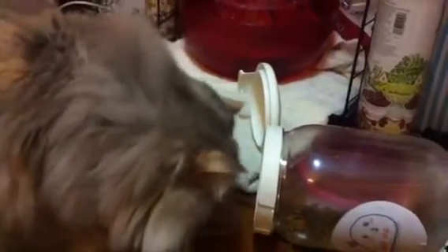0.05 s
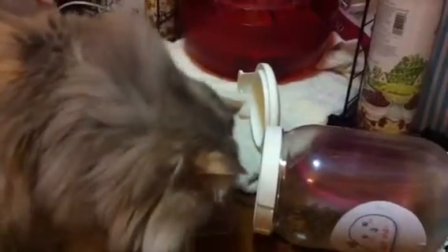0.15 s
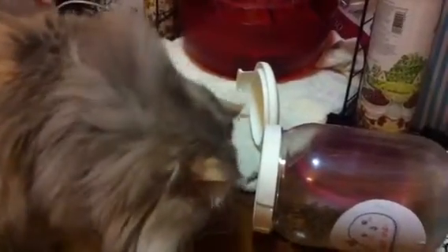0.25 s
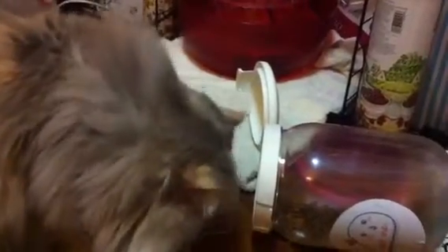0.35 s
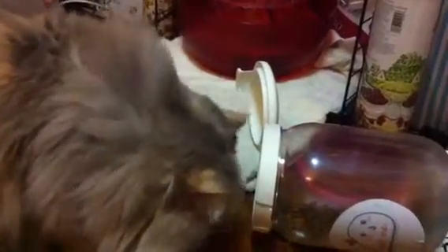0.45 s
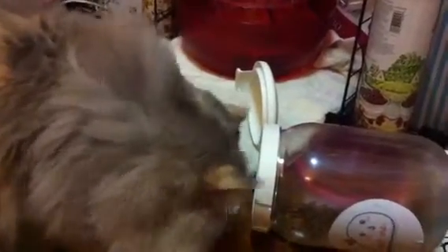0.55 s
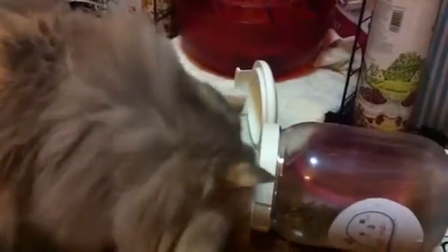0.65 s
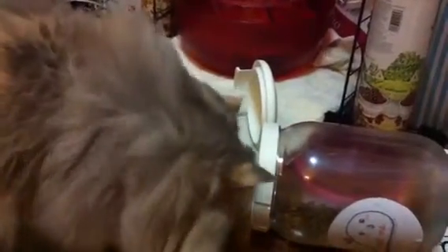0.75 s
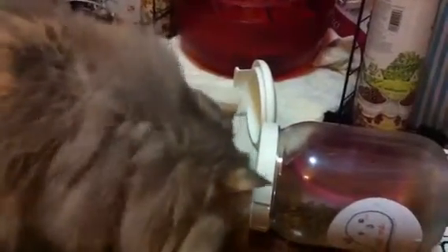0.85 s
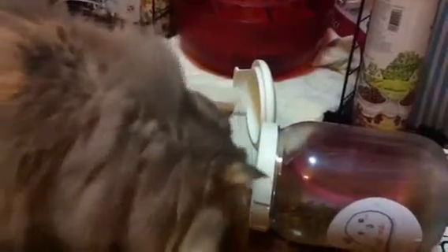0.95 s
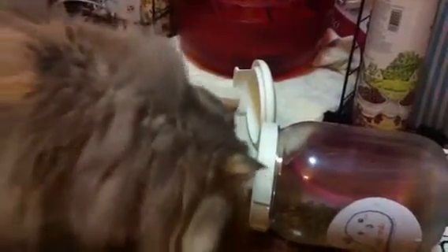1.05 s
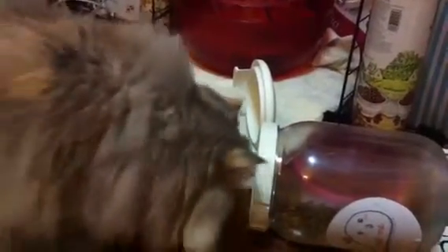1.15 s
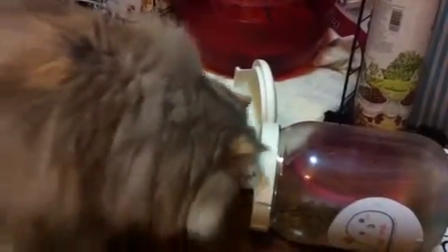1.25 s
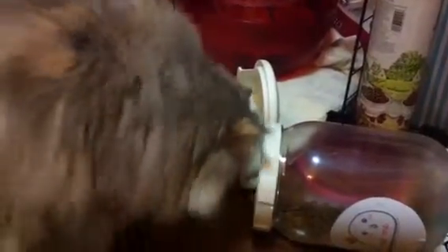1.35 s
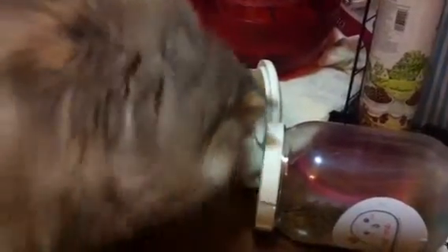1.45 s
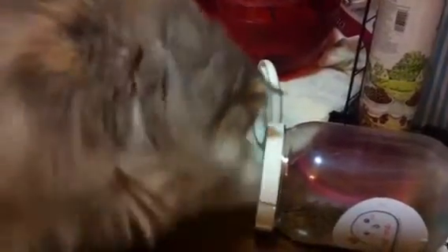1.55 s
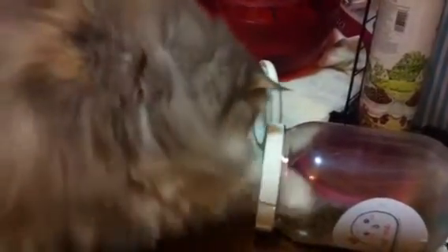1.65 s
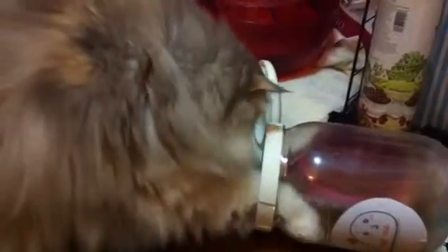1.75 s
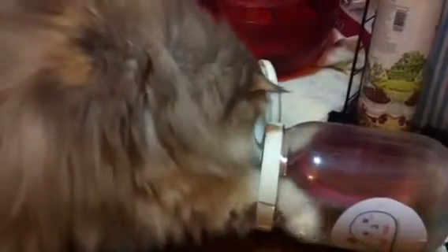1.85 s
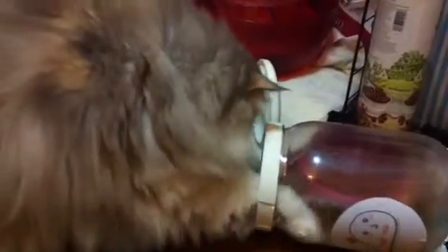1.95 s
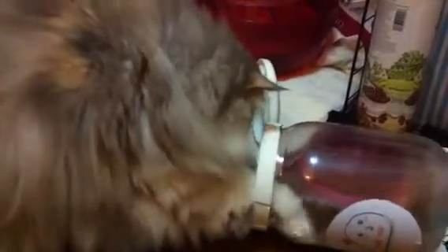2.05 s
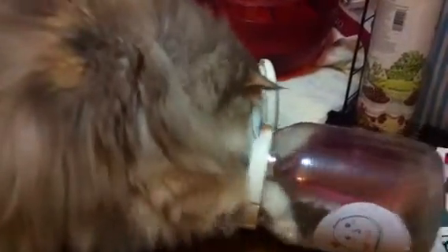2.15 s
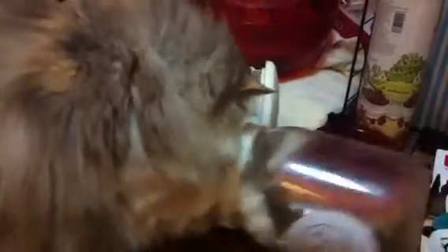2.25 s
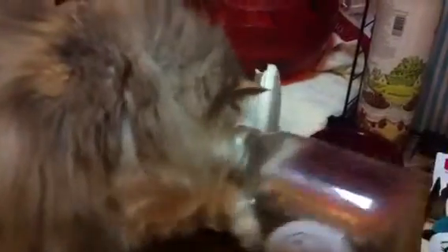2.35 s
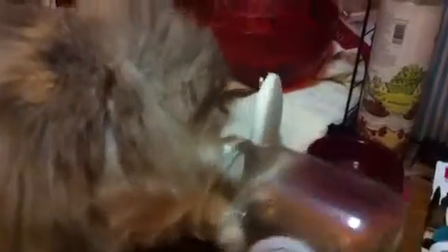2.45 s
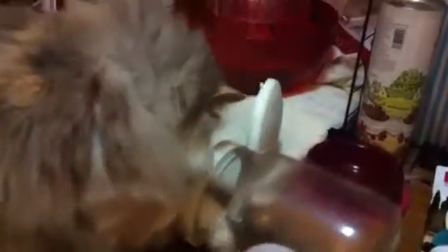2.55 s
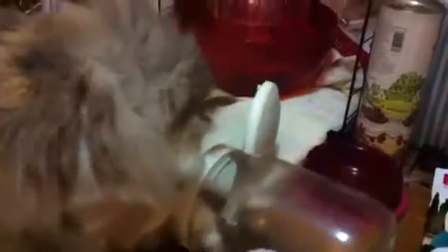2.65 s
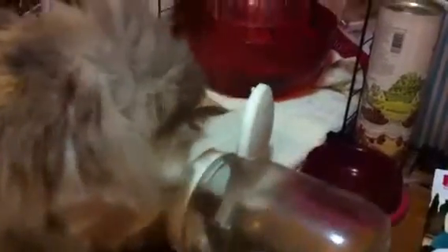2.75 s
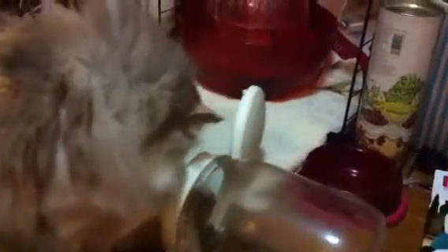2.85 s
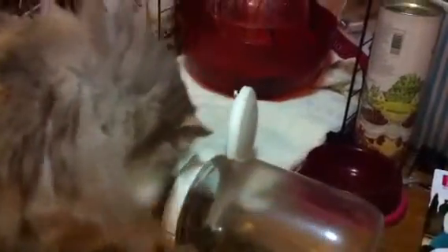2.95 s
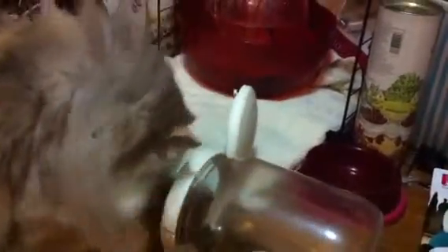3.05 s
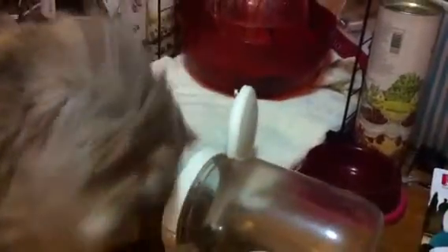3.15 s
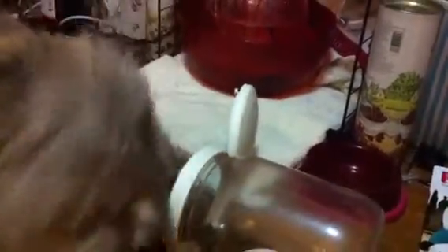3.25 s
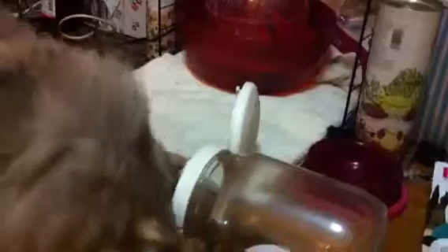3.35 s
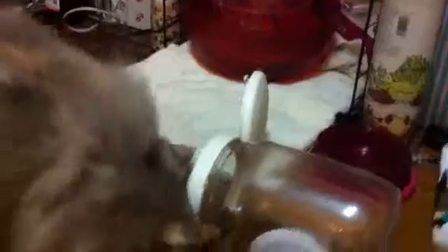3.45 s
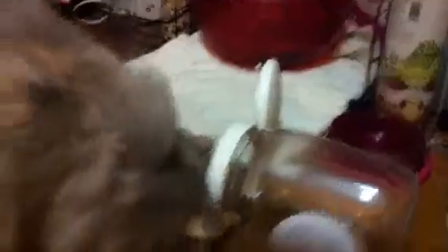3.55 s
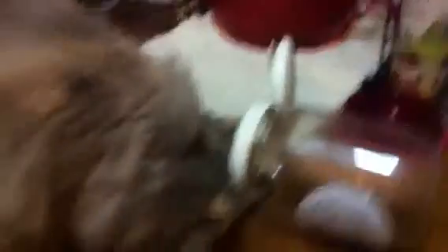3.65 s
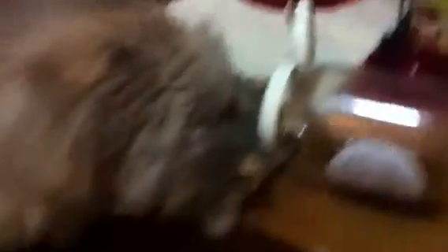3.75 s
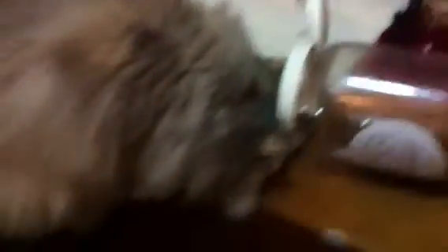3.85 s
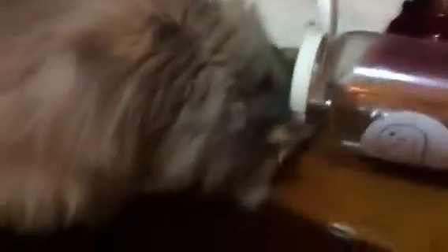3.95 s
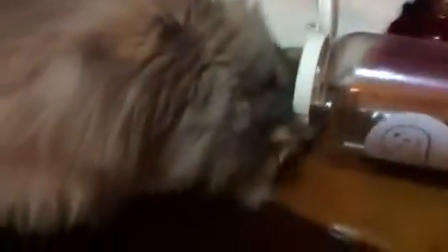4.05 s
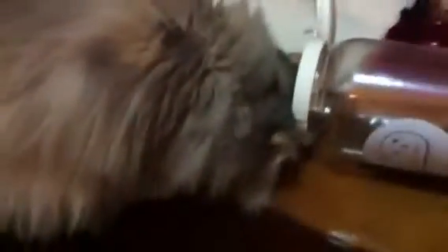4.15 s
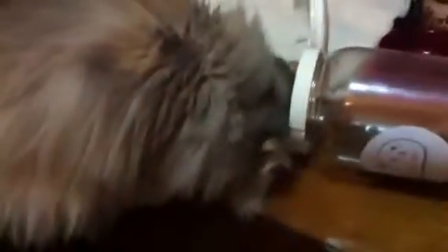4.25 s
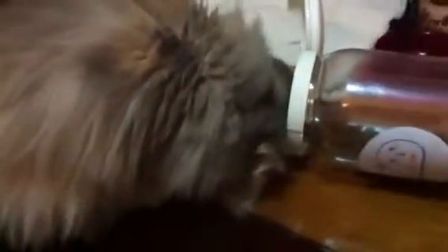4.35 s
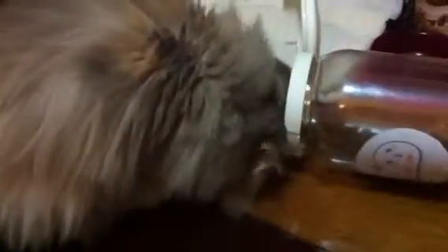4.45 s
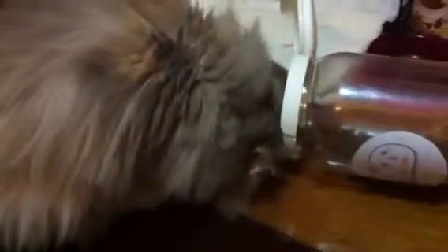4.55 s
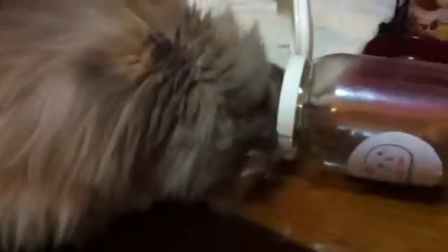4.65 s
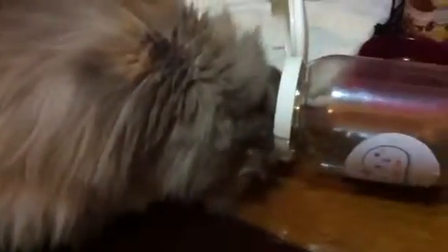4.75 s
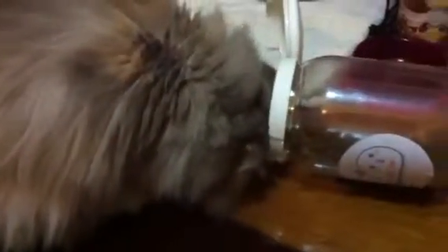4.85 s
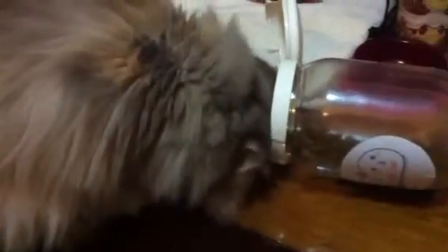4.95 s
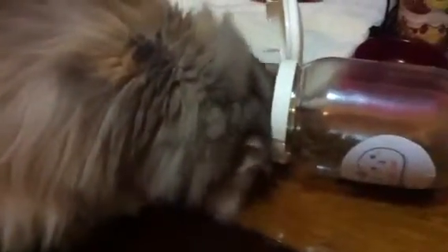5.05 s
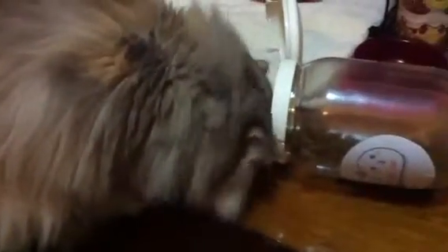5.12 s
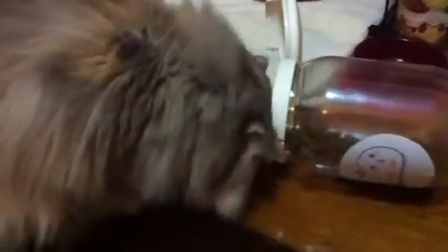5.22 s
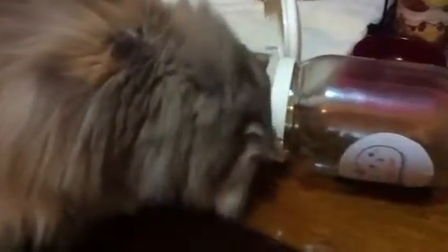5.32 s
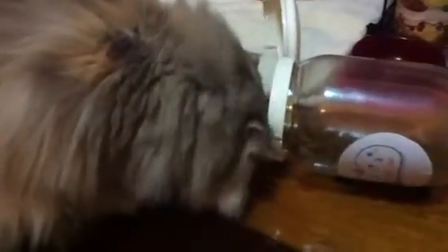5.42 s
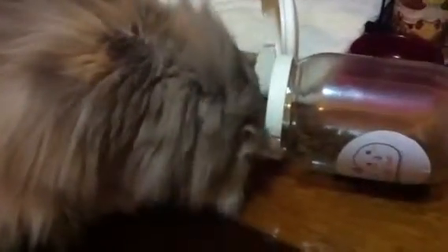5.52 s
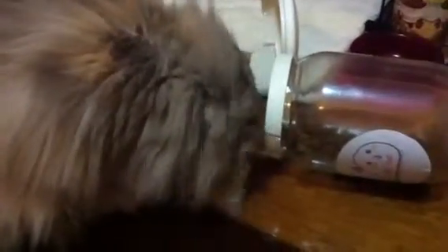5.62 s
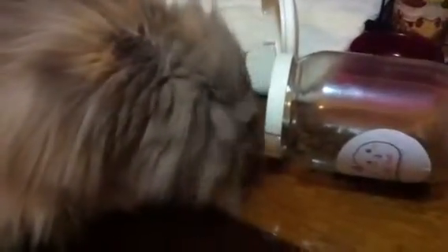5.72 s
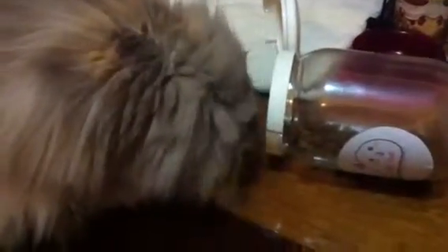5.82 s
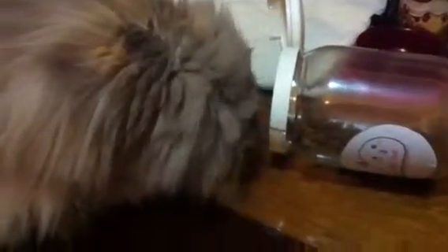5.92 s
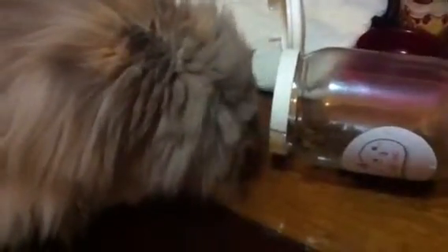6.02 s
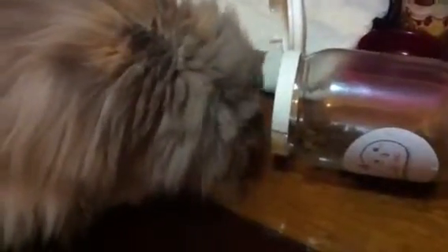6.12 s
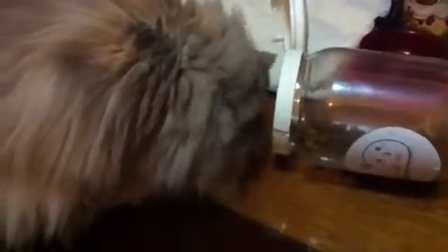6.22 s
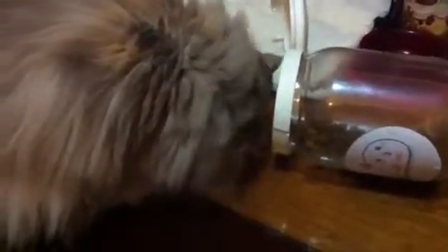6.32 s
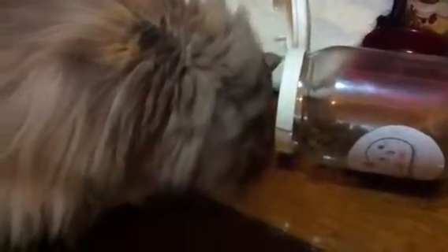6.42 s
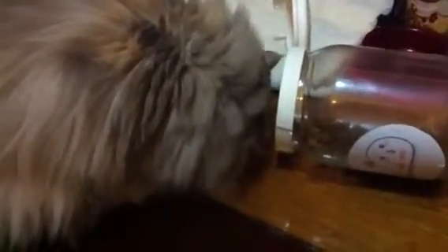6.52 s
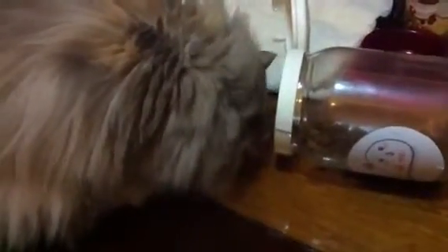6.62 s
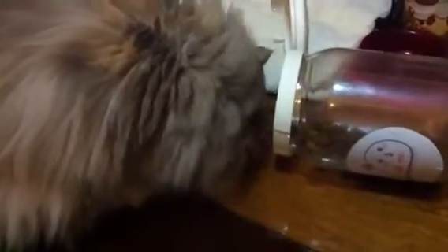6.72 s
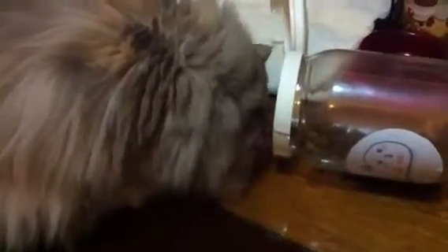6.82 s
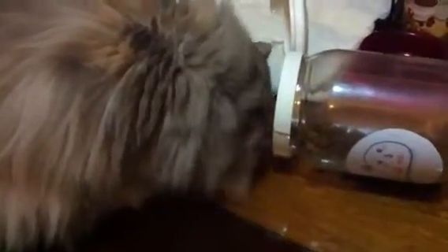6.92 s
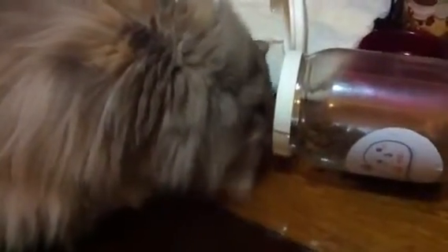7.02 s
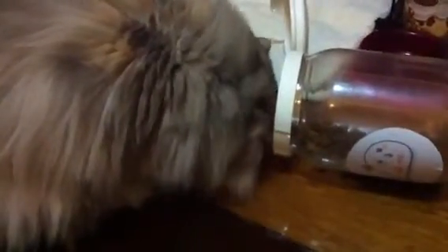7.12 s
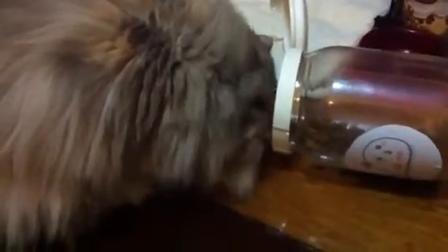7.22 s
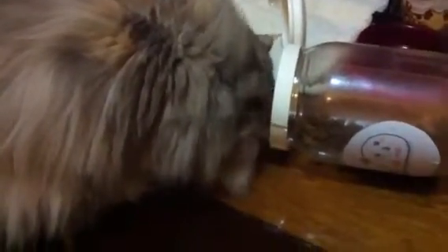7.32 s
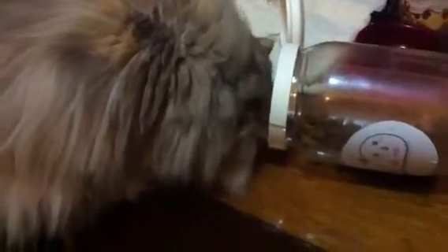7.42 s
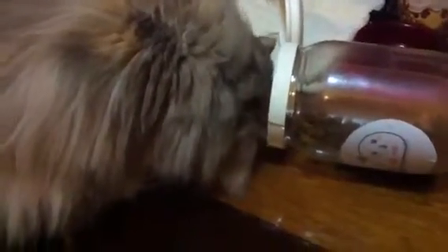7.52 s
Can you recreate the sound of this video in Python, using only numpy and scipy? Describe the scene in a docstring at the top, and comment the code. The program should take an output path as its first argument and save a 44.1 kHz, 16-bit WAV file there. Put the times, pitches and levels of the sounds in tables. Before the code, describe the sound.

A close, quiet indoor scene. From 0 to 2.2 seconds, dry pellets and claws make sparse, uneven crisp ticks inside a jar, some coloured by short hollow pips, over soft jerky rubbing and a light fur rustle. At about 2.3 to 2.4 seconds the jar is jolted: a rapid stuttering run of hard knocks with a woody thud and clatter, strongest near 2.35. A grainy slide and low drag across the table follow until about 2.8. At 2.84 comes one sharp, bright crack, with a tiny follow-up tap. From 3 seconds the delicate ticking and scratching resumes, with a duller scrape around 4.8 to 4.9, a distinctly louder bright click at 5.03, and continued pips and rustling until about 7.6. A short room tail surrounds everything; faint steady low rumble, soft hiss and a weak wavering appliance hum stay beneath.

```python
"""Cat at a food jar, close up

Indoors in a quiet home: a cat paws and noses dry food out of a jar lying on a wooden table, a phone close by.
Pellet and claw ticks are short noise bursts and snaps that ring the air in the jar; pips sound one resonance.
Rubbing is noise in stick-slip jerks; knocks ring the jar wall and the table as decaying sines.
A little room tail surrounds them; steady rumble and hiss, a hum and an appliance tone lie faintly underneath.
"""
import sys
import numpy as np
from scipy import signal
from scipy.fft import rfft, irfft
from scipy.io import wavfile
from scipy.ndimage import uniform_filter1d

SR = 44100
rng = np.random.default_rng(int(sys.argv[2]) if len(sys.argv) > 2 else 0)


def transcribe(signal):
    """Save signal, clipped to [-1, 1], as a 16-bit WAV file at the path in sys.argv[1]."""
    frames = np.atleast_2d(signal).T
    limited = np.clip(frames, -1, 1)
    pcm = np.round(limited * 32767).astype(np.int16)
    wavfile.write(sys.argv[1], SR, pcm)


N = 334278
GRAIN = 8192  # longest single event, in samples


def undb(db):
    """Decibels to gain."""
    return 10 ** (np.asarray(db) / 20)


def level(x, db):
    """Scale to an rms level."""
    return x * undb(db) / np.sqrt(np.mean(x ** 2))


def peak(x, db):
    """Scale each row to a peak level."""
    return x * (undb(db) / np.abs(x).max(axis=-1))[..., None]


def shaped(gain, size=N):
    """Noise whose gain is a function of frequency; rows of gain give rows of noise."""
    g = gain(np.maximum(np.fft.rfftfreq(size, 1 / SR), 1))
    white = rng.standard_normal(g.shape[:-1] + (size,))
    return irfft(rfft(white) * g, size)


def bell(hz, centre_hz, octaves):
    """Bell-shaped band on a log-frequency axis."""
    return np.exp(-.5 * (np.log2(hz / centre_hz) / octaves) ** 2)


def burst_noise(count, centre_hz, octaves):
    """One grain of bell-shaped noise per blow."""
    return shaped(lambda f: np.tile(bell(f, centre_hz, octaves), (count, 1)), size=GRAIN)


def above(x, hz):
    """Steep high-pass: a small body radiates nothing far below its lowest mode."""
    return signal.sosfilt(signal.butter(4, hz, "high", fs=SR, output="sos"), x)


def through(x, response):
    """Convolve along time, keeping the length."""
    return signal.fftconvolve(x, response, axes=-1)[..., :x.shape[-1]]


def rings(modes, scatter_db, count, size=GRAIN):
    """One response per blow: decaying sines, each blow landing elsewhere and so weighting them anew."""
    hz, db, t60 = np.transpose(modes)
    t = np.arange(size) / SR
    sines = np.sin(2 * np.pi * hz[:, None] * t) * 1000. ** (-t / t60[:, None])
    weights = undb(db + scatter_db * rng.standard_normal((count, len(hz))))
    return weights @ sines


def place(times, grains):
    """Lay each grain down at its time."""
    out = np.zeros(N + GRAIN)
    for s, g in zip(times, grains):
        i = int(s * SR)
        out[i:i + len(g)] += g
    return out[:N]


def slips(rate, spread_db, fade_ms):
    """Envelope of stick-slip rubbing: uneven jerks that start quickly and die away; rms 1."""
    chance, size = rng.random((2, N))
    jerks = (chance < rate / SR) * undb(-spread_db * np.log(1 - .95 * size))
    age = np.arange(SR // 10) / SR * 1000 / fade_ms
    power = through(jerks ** 2, np.exp(-2 * age) * (1 - np.exp(-age / 0.044)))
    return level(np.sqrt(np.abs(power)), 0)


def walk(rate):
    """Random levels held 1 / rate s and smoothed twice; spread near 1."""
    k = int(SR / rate)
    held = np.repeat(rng.standard_normal(N // k + 1), k)
    return 1.615 * uniform_filter1d(uniform_filter1d(held, k), k)[:N]


# Resonances of the air in the jar: f/Hz, level/dB, t60/s
AIR_MODES = [(670, -0.5, 0.018), (1024, -4, 0.061), (1124, -20, 0.028), (1140, -5.5, 0.049),
             (1286, -5, 0.057), (2007, -0.5, 0.0092), (2360, -5, 0.025), (2430, -6, 0.032),
             (3020, -6, 0.035), (3575, -3, 0.042), (4490, -8, 0.028), (5165, -4.5, 0.015),
             (5487, 0.5, 0.0099), (5920, 1.5, 0.007), (6720, -3.5, 0.0097)]


def ticks(s, db, hz, spray_db, fade_ms, octaves, size=GRAIN // 4):
    """A snap and a short rough contact, heard straight and through the air of the jar, with a spray of treble."""
    t = np.arange(size) / SR
    hz, octaves = hz[:, None], np.clip(octaves, .05, 1.5)[:, None]
    age = t * 1000 / np.clip(fade_ms, .2, 30)[:, None]
    fade = np.exp(-age) * (1 - np.exp(-age / 0.32))
    snap = np.sin(2 * np.pi * hz * t) * np.exp(-2.2 * hz * octaves * t)  # the wider the spread, the shorter
    snap_db = 5 + 0.5 * (db + 26.5)  # harder contacts snap more
    rough = fade * shaped(lambda f: bell(f, hz, octaves), size=size)
    contact = peak(rough, 0) + peak(snap, snap_db)
    # a narrow contact is mostly heard as the ring of the jar, a broad one as itself
    air = rings(AIR_MODES, 3., count=len(s), size=size)
    body = through(contact, air) + undb(43) * octaves * contact
    spray_hz = 11600 * 2 ** (0.11 * rng.standard_normal((len(s), 1)))
    spray_fade = np.exp(-1.2 * age) * (1 - np.exp(-age / 0.15))
    spray = spray_fade * shaped(lambda f: bell(f, spray_hz, 0.25), size=size)
    close = np.cos(np.pi / 2 * t / t[-1])  # no click at the grain's end
    return place(s, close * (peak(above(body, 436), db) + peak(spray, db + spray_db)))


# The louder pellet and claw ticks: t/s, peak level/dB, strongest f/Hz, treble spray level/dB re the tick
LOUD_TICKS = [(0.187, -50.5, 1050, 4), (0.236, -43, 2280, -4), (0.244, -44.5, 3250, -7),
              (0.337, -49, 4530, 2.5), (0.392, -58, 4500, 12), (0.417, -46, 1370, -10),
              (0.445, -44.5, 2240, -18), (0.497, -57, 3550, 15), (0.568, -47.5, 2300, 8),
              (0.634, -41.5, 5550, -8), (0.651, -40.5, 5300, -10), (0.662, -41, 3270, -7),
              (0.78, -45.5, 4400, -28), (0.827, -43, 2480, -24), (0.843, -38, 4870, -33),
              (0.901, -41, 5370, -6), (0.94, -51, 2430, 7), (1.101, -47, 2280, 0), (1.113, -46, 4700, -12),
              (1.147, -44.5, 4600, -2), (1.182, -41.5, 3650, -30), (1.187, -43, 4500, -32),
              (1.196, -55, 4630, -20), (1.211, -36, 6700, -13), (1.387, -44, 3400, 5.5),
              (1.4, -50, 1100, 10), (1.438, -46.5, 3300, 0), (1.461, -46.5, 5270, 4),
              (1.541, -41.5, 5740, -4), (1.6, -46, 5830, 1), (1.66, -50, 1340, 9.5),
              (1.791, -47, 5000, -15), (1.843, -42, 4930, -25), (2.01, -43, 4930, -15),
              (2.106, -40, 5330, -5), (2.269, -40.5, 4930, -9), (2.472, -41.5, 2330, -5),
              (2.539, -40, 2880, 9), (2.732, -38.5, 2110, -19), (2.946, -52, 2040, 11),
              (2.98, -49, 1000, 5), (3.08, -49.5, 1140, -11), (3.238, -43.5, 4640, 2.5),
              (3.372, -47.5, 4830, 6.5), (3.483, -51, 2400, 13), (3.525, -42.5, 4300, -24),
              (3.575, -37.5, 2140, -36), (3.577, -40, 4670, -23), (3.659, -46.5, 2940, -20),
              (3.678, -49, 1130, 2), (3.74, -47.5, 5970, 9.5), (3.784, -42, 6700, -20),
              (3.829, -38.5, 5060, -21), (3.955, -44.5, 2850, -8), (3.99, -58.5, 1290, 20),
              (4.016, -42, 5360, -6), (4.074, -41.5, 3560, -10), (4.492, -41, 4970, -33),
              (4.514, -38, 2440, -28), (4.628, -41, 5700, -6), (4.645, -46, 5430, 0),
              (4.674, -45, 2350, -18), (4.733, -43.5, 2400, -14), (4.75, -53, 2880, 13),
              (4.803, -47, 2200, -15), (4.818, -41, 980, -21), (4.852, -47, 2750, -15),
              (4.867, -46, 2490, -19), (4.88, -50, 945, 0), (4.916, -46.5, 2310, 10),
              (4.955, -45, 1030, 10), (5.025, -31.5, 3980, -1), (5.025, -28.5, 5260, -2),
              (5.055, -45, 4600, 5), (5.136, -41.5, 2700, -10), (5.212, -44, 5100, 9),
              (5.228, -36.5, 5870, 0), (5.278, -39, 3000, -17), (5.306, -52, 1100, 13),
              (5.418, -50, 2830, 5), (5.455, -48.5, 1950, -9), (5.541, -52.5, 1130, 14.5),
              (5.555, -45, 4900, 1), (5.691, -44.5, 3350, -19), (5.862, -50, 3480, -10),
              (5.984, -43, 5300, 0), (6.028, -46, 2360, 1), (6.07, -48, 5300, -14),
              (6.169, -46.5, 2370, -16), (6.282, -42, 2670, 2.5), (6.328, -42, 3800, 7),
              (6.355, -47, 2650, 3), (6.449, -38, 4870, -17), (6.461, -44, 5900, -16),
              (6.499, -43, 4100, -3), (6.576, -39, 5300, -2), (6.607, -44, 4430, -19),
              (6.679, -48, 2220, 10.5), (6.744, -48, 1730, -21), (6.791, -42, 3700, -39),
              (6.947, -59, 5000, 20.5), (6.97, -40.5, 3150, -4), (7.169, -52, 2960, 8.5),
              (7.231, -38, 4210, -14), (7.232, -37, 4400, -16), (7.241, -54, 4000, -10),
              (7.284, -36.5, 2910, -29), (7.389, -49.5, 3000, -13), (7.478, -49, 1320, -27),
              (7.519, -45.5, 4700, -11)]
TICK_FADE_MS, TICK_OCTAVES = 4.6, 0.2  # a typical contact at 2.5 kHz
TICK_SCATTER = 0.25  # log spread of both
FADE_SLOPE, SPREAD_SLOPE = -0.055, 0.042  # exponents of pitch


def loud_ticks():
    """The louder contacts: lower ticks come from bigger contacts and last longer."""
    s, db, hz, spray_db = np.transpose(LOUD_TICKS)
    fade_vary, spread_vary = np.exp(TICK_SCATTER * rng.standard_normal((len(s), 2)).T)
    pitch = hz / 2500
    fade_ms = TICK_FADE_MS * pitch ** FADE_SLOPE * fade_vary
    octaves = TICK_OCTAVES * pitch ** SPREAD_SLOPE * spread_vary
    return ticks(s, db, hz, spray_db, fade_ms, octaves)


def patter(stir_db, count=500):
    """Countless smaller pellets shift: mostly faint, of any pitch, as loud as the stirring around them."""
    when, loudness, pitch, spray, fade, spread = rng.random((count, 6)).T
    s = when * (N - 1) / SR
    db = stir_db[(s * SR).astype(int)] + 6.5 - 2.0 * np.log(1 - 0.88 * loudness)
    hz = 950 * 2 ** (3.014 * pitch)
    return ticks(s, db, hz, -22 + 26 * spray ** 2.0, 0.5 + 4 * fade, 0.038 + 0.91 * spread)


PIP_RISE, PIP_DETUNE, PIP_WOBBLE = 0.22, 0.035, 0.47  # share of the length; pitch spread; unevenness of the level


def pips(s, length_ms, db, hz, size=GRAIN // 4):
    """A short uneven sine that swells, holds and dies; its pitch slides a little."""
    age = np.arange(size) / SR * 1000 / np.clip(length_ms, 2, 40)[:, None]
    u = rng.standard_normal((len(s), 3)).T[..., None]
    swell = (1 - np.exp(-(age / PIP_RISE) ** 2)) * np.exp(-1.6 * age ** 2.0)
    swell = swell * (1 + PIP_WOBBLE * np.sin(6 * age + 3 * u[0]))
    sliding_hz = hz[:, None] * (1 + PIP_DETUNE * u[1] * (np.minimum(age, 1.5) - .5))
    phase = np.cumsum(sliding_hz, axis=1) * 2 * np.pi / SR
    return place(s, peak(swell * np.sin(phase), db))


# Glancing contacts, each a small clear pip: t/s, length/ms, peak level/dB, f/Hz
CLEAR_PIPS = [(0.052, 5.1, -42, 3540), (0.67, 6.1, -46, 3556), (0.887, 15, -43.5, 1100),
              (0.941, 9.9, -42.5, 2400), (1.146, 8.8, -44.5, 2970), (1.205, 8.7, -46, 3030),
              (1.278, 13, -50.5, 3020), (1.463, 8.8, -40, 3570), (1.631, 8.8, -41.5, 2350),
              (1.68, 8.6, -48.5, 2360), (1.771, 9.4, -45.5, 2390), (1.79, 7.2, -45.5, 3600),
              (1.852, 9.8, -45.5, 2340), (1.966, 12, -47.5, 3580), (2.215, 7.4, -38.5, 2350),
              (2.507, 9.8, -46, 2710), (2.632, 13, -49, 2420), (2.661, 7.6, -42, 2310),
              (3.521, 35, -51, 3620), (3.526, 20, -47, 1088), (4.073, 13, -45, 1020),
              (4.375, 8.5, -45.5, 3650), (4.438, 9.2, -49.5, 2390), (4.741, 12, -43, 1015),
              (4.958, 25, -42, 1290), (5.2, 10.6, -43, 2460), (5.212, 9.8, -45, 3620),
              (5.37, 11, -43, 1130), (5.693, 17, -43.5, 1045), (5.861, 9.7, -40.5, 1037),
              (5.959, 21, -42, 1058), (6.118, 9.7, -48.5, 2420), (6.17, 21, -51, 3560),
              (6.213, 6.9, -44, 2380), (6.357, 8.6, -44, 3000), (6.527, 13, -41, 1108),
              (6.576, 8, -46, 4420), (7.017, 24, -45.5, 1030), (7.167, 8.3, -42.5, 2980)]


def clear_pips():
    """Glancing contacts that sound one resonance of the jar alone."""
    return pips(*np.transpose(CLEAR_PIPS))


# Resonances that the weaker pips sound: f/Hz
FAINT_PIP_PITCHES = [1040, 1280, 2440, 3150, 3603]


def faint_pips(stir_db, count=50):
    """Many weaker pips on the same few resonances."""
    when, which, detune, length, loudness = rng.random((count, 5)).T
    s = when * (N - 1) / SR
    hz = np.array(FAINT_PIP_PITCHES)[(which * len(FAINT_PIP_PITCHES)).astype(int)]
    hz = hz * (1 + 0.023 * (detune - .5))
    db = stir_db[(s * SR).astype(int)] + 4 + 5 * loudness
    return pips(s, 4 + 7 * length, db, hz)


# Resonances of the table top: f/Hz, level/dB, t60/s
TABLE_MODES = [(277, -15, 0.29), (309.5, 4.5, 0.099), (452, 0, 0.029), (474, -7, 0.14), (669, -3.5, 0.045),
               (810, -9, 0.066), (1090, 6, 0.019), (1280, -8.5, 0.039)]
# Blows of the jar: t/s, peak level/dB, then re that peak: table thud level/dB, treble crack level/dB,
# clatter level/dB; time until the jar lands again and damps the rings t/ms, lift of the wall's upper modes/dB
BLOWS = [(2.3, -41.5, -25, -3, 2, 5.2, 10), (2.319, -34, -31, -16, -11, 12, 6),
         (2.3347, -29, 8.5, -11, 3, 18, 14), (2.3464, -20.5, -39, -21, -14, 25, 9),
         (2.359, -38, -3, -13, 1, 20, 6), (2.391, -38.5, 8, -23, -10, 24.7, 2),
         (2.3996, -31, -29, -27, -9, 30, 3), (2.8442, -20, -23, -2.5, -25, 62, 0),
         (2.9073, -50.5, 7.5, 6, -5, 54, 8)]
# Resonances of the jar wall and lid: f/Hz, level/dB, t60/s
WALL_MODES = [(1500, 7, 0.022), (2026, 19, 0.038), (2310, 9, 0.045), (2600, -1, 0.084), (2763, -3, 0.05),
              (2940, -5, 0.037), (3480, -8, 0.0078), (4400, -8, 0.035), (5840, -10.5, 0.042),
              (6380, -4, 0.027), (6870, -11, 0.072), (8100, -21, 0.067), (10800, -11, 0.02),
              (11330, -5, 0.029)]
THUD_RISE_MS, DAMP_MS = 1.2, 1.3
THUD_DAMPED_DB, WALL_DAMPED_DB = -28, -15  # what is left of the rings once the jar has landed


def knocks():
    """Each blow rings the wall, thuds the table and shakes the pellets; a sharp blow also cracks and rings high."""
    s, db, thud_db, crack_db, clatter_db, held_ms, lift_db = np.transpose(BLOWS)
    count = len(s)
    t = np.arange(GRAIN) / SR
    modes = np.array(WALL_MODES)
    band = np.digitize(modes[:, 0], (2200, 3400))
    low, upper, high = (rings(modes[band == k], 1.5, count=count) for k in range(3))
    low = low + undb(lift_db)[:, None] * upper
    crack = np.exp(-t / 0.0041) * burst_noise(count, 8500, 0.6)
    clatter = np.exp(-t / .011) * burst_noise(count, 1900, .8)
    rattle = 1.5 + 0.7 * level(burst_noise(count, 150, 1.2), 0)  # the loose lid buzzes
    free = (1 - np.tanh((t * 1000 - held_ms[:, None]) / DAMP_MS)) / 2  # 1 until the jar lands, then 0
    wall_damping = free + (1 - free) * undb(WALL_DAMPED_DB)
    low, high = low * wall_damping, high * wall_damping
    thud_envelope = (1 - np.exp(-t * 1000 / THUD_RISE_MS)) * (free + (1 - free) * undb(THUD_DAMPED_DB))
    close = np.cos(np.pi / 2 * t / t[-1])
    thud = above(thud_envelope * rings(TABLE_MODES, 1.1, count=count), 166) * close
    blow = peak(above(low * (1 + 0.15 * rattle), 2300), db)
    blow = blow + peak(above(clatter, 370), db + clatter_db)
    blow = blow + peak(thud, db + thud_db)
    blow = blow + peak(above(high * rattle, 3800), db + crack_db - 0.5)
    blow = blow + peak(crack, db + crack_db)
    return place(s, blow)


# Rubbing, as nominal background levels before each layer's trim: t/s, bright scrape in the jar level/dB,
# dull scrape level/dB, jar on the table level/dB, fur level/dB
RUBBING = [(0.0, -61.5, -62, -72, -71), (0.76, -59, -61, -63.5, -64.5), (1.14, -62, -55, -64, -67.5),
           (2.15, -57, -67.5, -68, -64.5), (2.51, -54, -59, -52.5, -60), (3.27, -60, -61.5, -65.5, -64.5),
           (3.44, -59.5, -58, -62.5, -66.5), (4.09, -59, -62, -59, -61), (4.43, -57.5, -69, -61, -69),
           (4.9, -56.5, -51, -59.5, -65), (5.11, -60, -69, -63, -64.5), (5.38, -56.5, -67, -64, -61),
           (5.81, -59.5, -55.5, -58.5, -66.5), (6.25, -64.5, -57.5, -65, -67),
           (6.56, -56.5, -55.5, -65, -62.5), (6.93, -60, -57.5, -65.5, -65), (7.22, -58, -55.5, -63.5, -63),
           (7.58, -56, -64, -70, -67)]


def stirring():
    """The four rubbing levels, bright, dull, drag and fur, gliding between the listed times."""
    s, *columns = np.transpose(RUBBING)
    return [np.interp(np.arange(N) / SR, s, c) for c in columns]


def rustle(bright_db, dull_db, drag_db, fur_db):
    """Rubbing rumbles in the table and fills the jar's low and high resonances; fur crackles above them."""
    air = rings(AIR_MODES, 0., count=1)[0]
    air[0] += undb(23.5)  # some of it arrives straight
    wood = rings(TABLE_MODES, 0., count=1)[0]
    wood[0] += undb(44.5)
    drag = through(shaped(lambda f: bell(f, 370, 1.0)) * slips(60, 2.2, 26), wood)
    dull = through(shaped(lambda f: bell(f, 1075, 0.66)) * slips(70, 7.0, 32.0), air)
    brushing = slips(45, 7.4, 25.7)  # one stroke stirs pellets and fur alike
    # separate patches rub at separate pitches, each in its own jerks
    bright, fur = 0, 0
    for hz, db in ((2300, -2), (3400, -6.5), (5200, 3.0)):
        bright = bright + level(shaped(lambda f: bell(f, hz, 0.49)), db) * slips(55, 4.6, 5.5)
    bright = through(bright * brushing ** 1.04, air)
    for hz, db in ((6800, -4), (8300, -6), (10200, -1.5), (12200, -1), (14500, -10.5)):
        patch = level(shaped(lambda f: bell(f, hz, 0.21)), db)
        fur = fur + patch * brushing ** 0.41 * slips(110, 4.7, 13.6)
    return (level(drag, -4.5) * undb(drag_db) + level(dull, -6.0) * undb(dull_db)
            + level(bright, -4.0) * undb(bright_db) + fur * undb(fur_db))


# Longer grainy scrapes: start t/s, length/s, noise level/dB before swell and jerks, centre f/Hz, spread/octaves
SLIDES = [(0.226, 0.04, -60, 2600, 0.43), (0.64, 0.058, -61, 4630, 0.44), (2.327, 0.1, -48, 2600, 0.2),
          (2.364, 0.029, -40, 460, 0.08), (2.42, 0.086, -53, 300, 0.42), (2.48, 0.61, -61, 300, 0.3),
          (2.537, 0.013, -43.5, 2600, 1.08), (2.555, 0.068, -49.5, 3760, 1.1),
          (2.578, 0.025, -51, 2290, 0.08), (3.516, 0.024, -48.5, 4280, 0.29), (4.8, 0.097, -50, 1010, 0.38),
          (4.809, 0.079, -54.5, 2470, 0.74), (5.31, 0.096, -55, 1090, 0.095)]


def scrapes():
    """The jar or a pawful of pellets slides: dense jerks of noise, narrow or broad, that swell and fade."""
    t, out = np.arange(N) / SR, 0
    for s, length, db, hz, octaves in SLIDES:
        swell = np.sin(np.pi * np.clip((t - s) / length, 0, 1) ** 0.62) ** 1.1
        out = out + swell * level(shaped(lambda f: bell(f, hz, octaves)), db)
    return above(out * slips(900, 4.6, 2.8), 230)


ROOM_T60_S, ROOM_DB = 0.26, -11.5
ROOM_LOW_HZ, ROOM_HZ = 427, 5830  # the room returns less and less below and above these


def room(near):
    """A little room around the jar: band-limited noise that dies away, starting after 4 ms."""
    t = np.arange(SR // 2) / SR
    noise = shaped(lambda f: 1 / (1 + (f / ROOM_HZ) ** 2) / (1 + (ROOM_LOW_HZ / f) ** 2), size=len(t))
    tail = noise * 1000. ** (-t / ROOM_T60_S) * (t > .004)
    return undb(ROOM_DB) * through(near, tail / np.sqrt(np.sum(tail ** 2)))


# Colour of the rumble and hiss: f/Hz, relative density level/dB per Hz
HOUSE_COLOUR = [(25, -20), (75, -20.5), (120, -12), (200, 0), (300, 0.5), (390, -1.5), (520, -21),
                (1000, -8.5), (2400, -14), (5000, -20.5), (8000, -36), (12000, -22), (15500, -27)]
HOUSE_DB, HOUSE_WAVER_DB = -60.5, 0.6  # rms before the waver; spread of the waver
# A faint wavering hum: f/Hz, width/Hz, level/dB
FAINT_HUM = (99.3, 1.45, -82)
# A wavering appliance tone: f/Hz, width/Hz, level/dB
APPLIANCE = (167, 6.77, -71.5)


def house():
    """Steady rumble and hiss as shaped noise, a faint hum and an appliance tone as sines that waver."""
    hz, db = np.transpose(HOUSE_COLOUR)
    air = level(shaped(lambda f: undb(np.interp(np.log(f), np.log(hz), db))), HOUSE_DB)
    tones = 0
    for centre_hz, width_hz, tone_db in (FAINT_HUM, APPLIANCE):
        phase = np.cumsum(centre_hz + width_hz / 2 * walk(6)) * 2 * np.pi / SR
        tones = tones + level(np.sin(phase) * undb(1.2 * walk(6)), tone_db)
    return air * undb(HOUSE_WAVER_DB * walk(3.96)) + tones


def scene():
    """Everything at the jar, a little room around it, the house below."""
    bright_db, dull_db, drag_db, fur_db = stirring()
    near = loud_ticks() + patter(bright_db)
    near = near + clear_pips() + faint_pips(bright_db)
    near = near + knocks() + rustle(bright_db, dull_db, drag_db, fur_db) + scrapes()
    return (near + room(near) + house())[None]


TOP_HZ = 15800


def record(dry):
    """Steep low-pass at TOP_HZ: nothing is heard above about 15.8 kHz."""
    return signal.sosfilt(signal.ellip(10, .2, 70, TOP_HZ, fs=SR, output="sos"), dry)


dry = scene()
out = record(dry)
transcribe(out)
```